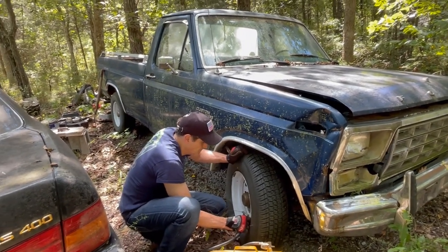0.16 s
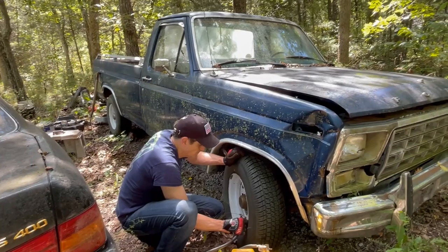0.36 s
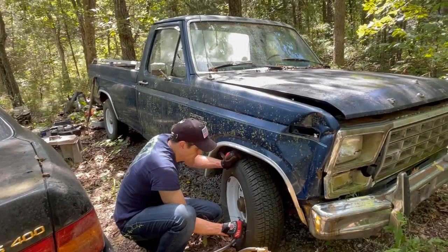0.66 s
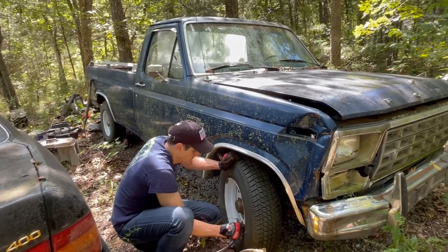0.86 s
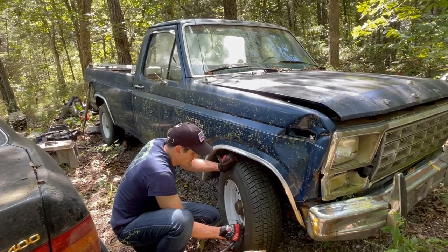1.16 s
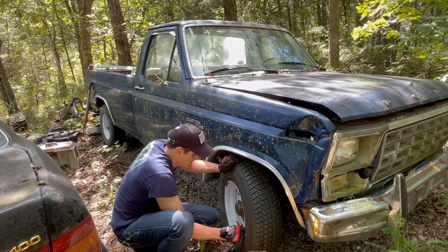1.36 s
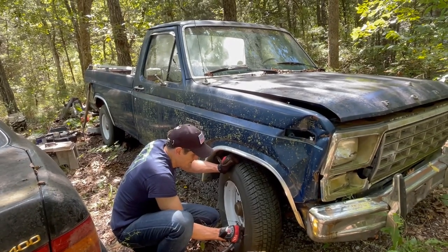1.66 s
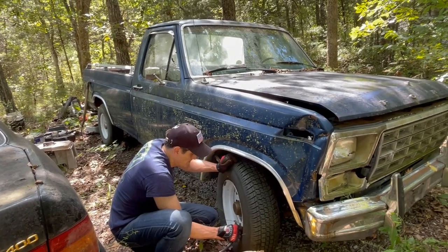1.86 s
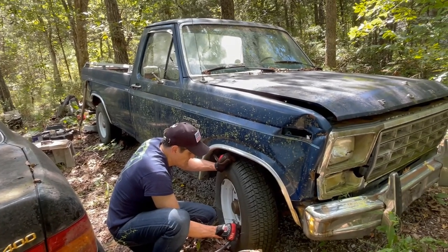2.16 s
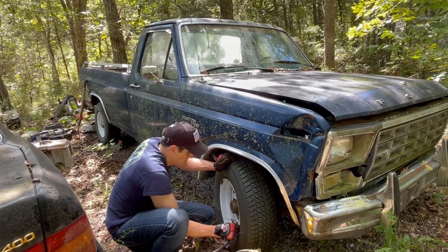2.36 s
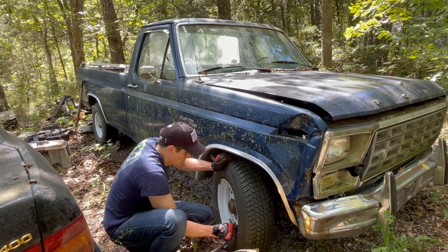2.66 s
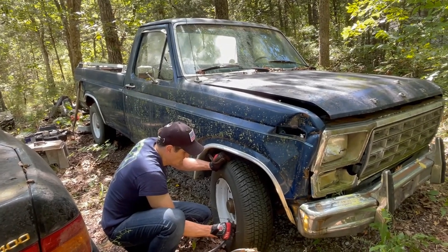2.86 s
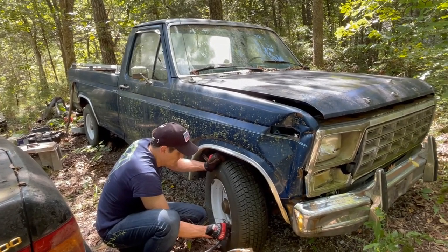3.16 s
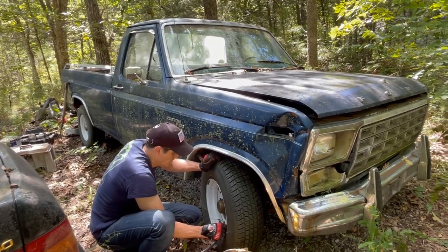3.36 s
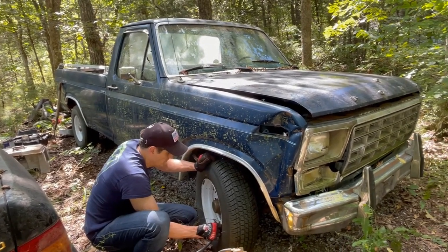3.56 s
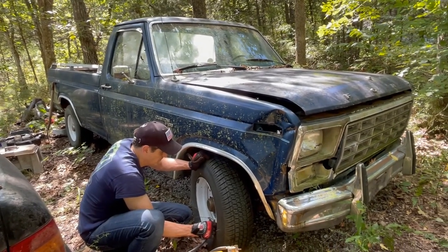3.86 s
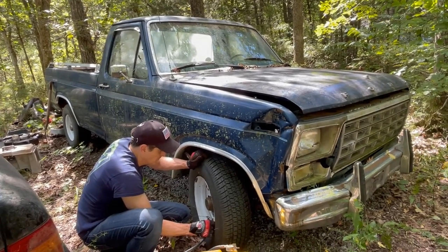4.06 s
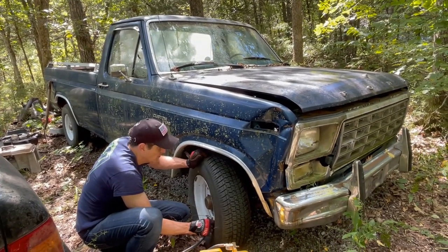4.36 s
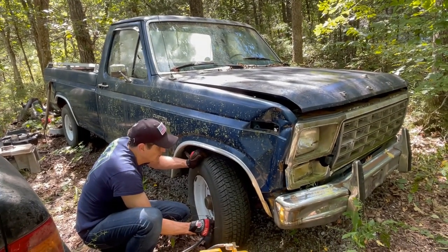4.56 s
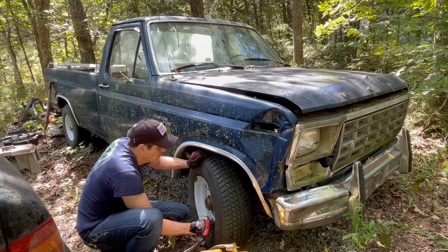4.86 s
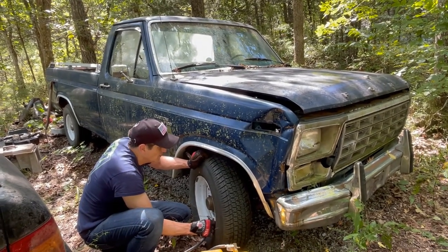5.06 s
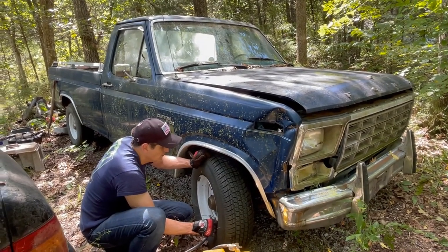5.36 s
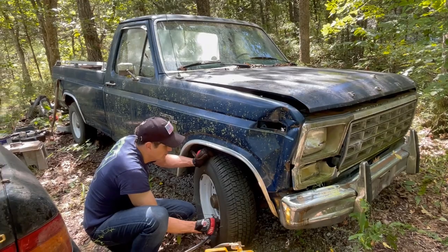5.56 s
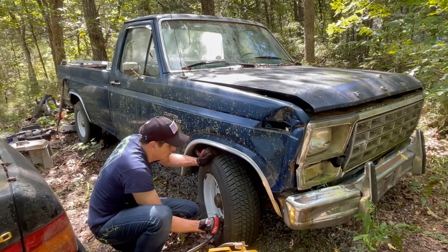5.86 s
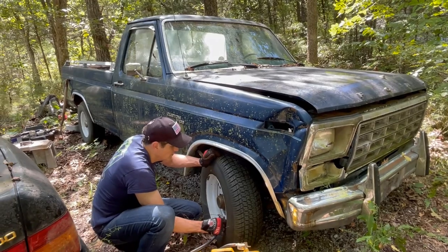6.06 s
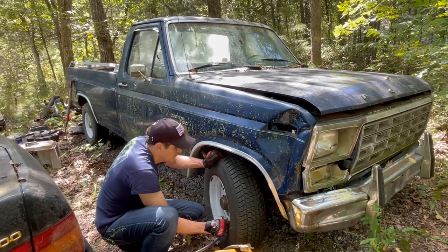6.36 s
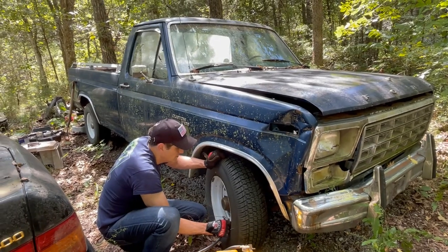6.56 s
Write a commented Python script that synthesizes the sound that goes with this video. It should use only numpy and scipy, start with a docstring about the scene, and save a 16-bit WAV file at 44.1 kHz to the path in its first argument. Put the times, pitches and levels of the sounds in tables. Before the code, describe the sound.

A tire is being inflated outdoors, air hissing steadily past the valve with quick pulses and thin whistling over a faint motor.

```python
"""In the woods, a tyre is being filled: compressed air hisses past the chuck held on the valve stem.
The leak swells as the hand shifts, and the gap makes gliding half-whistles and one thin high note.
Pump strokes, about eleven a second, add short spurts, and the flow keeps the air line ringing.
A motor hums some way off, over a faint rustle, a soft low hiss and a thin, very high one."""
import sys
import numpy as np
from scipy import signal
from scipy.fft import rfft, irfft
from scipy.io import wavfile
from scipy.ndimage import uniform_filter1d

SR = 44100
rng = np.random.default_rng(int(sys.argv[2]) if len(sys.argv) > 2 else 0)


def digitize_waveform(pressure):
    """Quantize a signal to 16-bit integers and store it at the path in sys.argv[1].

    Rows of a 2-D input are taken as channels; values are limited to [-1, 1].
    """
    field = np.atleast_2d(pressure).T
    bounded = np.clip(field, -1, 1)
    quanta = np.round(bounded * 32767).astype(np.int16)
    wavfile.write(sys.argv[1], SR, quanta)


N = 296352
TIME = np.arange(N) / SR
SIDES = np.array([[1], [-1]])  # left, right


def undb(db):
    """Turn decibels into a number to multiply by."""
    return 10 ** (np.asarray(db) / 20)


def unit(x):
    """Scale a signal to an average (rms) strength of 1."""
    return x / np.sqrt(np.mean(x ** 2))


def curve(table, t=TIME, column=1):
    """Read a table over time, joining its rows with straight lines."""
    rows = np.array(table, float)
    return np.interp(t, rows[:, 0], rows[:, column])


def colour(table, hz, column=1):
    """Read a table over frequency, giving each octave equal room."""
    rows = np.array(table, float)
    return np.interp(np.log(hz + 1), np.log(rows[:, 0]), rows[:, column])


def bell(offset, width):
    """A smooth bump of height 1."""
    return np.exp(-.5 * (offset / width) ** 2)


def wander(rate_hz):
    """A smooth random wobble of typical size 1; a higher rate wobbles faster."""
    f = np.fft.rfftfreq(N, 1 / SR)
    f = f[f < 4 * rate_hz]
    real, imag = rng.standard_normal((2, 4096))[:, :len(f)]
    return unit(irfft((real + 1j * imag) * np.exp(-(f / rate_hz) ** 2), N))


def swells(events, attack_s, release_s, t=TIME):
    """Decibels added by events (start, length, rise) that each grow, hold and let go."""
    return sum(db * np.clip(np.minimum((t - start) / attack_s, 1 - (t - start - length) / release_s), 0, 1)
               for start, length, db, *_ in events)


def flicker(x, depth_db):
    """Let neighbouring frequency bands of a noise rise and fall on their own."""
    spectrum = signal.stft(x, SR, nperseg=2048)[2]
    patches = rng.standard_normal(spectrum.shape[1:])
    patches = uniform_filter1d(patches, size=9, axis=0)
    patches = uniform_filter1d(patches, size=4, axis=1)
    return signal.istft(spectrum * undb(depth_db * unit(patches)), SR)[1][:, :N]


# How left and right differ. Each row: frequency in Hz, left minus right in dB, likeness from -1 to 1.
STEREO_IMAGE = [(93, -3, 0.8), (302, 2.5, 0.067), (730, 2.5, -0.47), (930, -3.5, 0.29), (1590, -3.5, 0.56),
                (1820, -7.5, 1), (2450, -0.5, 0.13), (2760, -2, -0.3), (3820, 4.5, 0.0073), (5500, 3, 0.02),
                (5800, 1, -0.25), (6620, 6.5, 0.36), (6960, 7, -0.16), (8350, 5, -0.16), (9350, -2, -0.2),
                (10940, 0.5, 0.81), (14200, 0.5, -0.72)]

def noise(gain_at):
    """Stereo noise of strength 1, shaped by a gain for each frequency."""
    f = np.fft.rfftfreq(N, 1 / SR)
    alike = np.clip(colour(STEREO_IMAGE, f, column=2), -1, 1)
    mid, side = rfft(rng.standard_normal((2, N)))
    pair = np.sqrt(1 + alike) * mid + SIDES * np.sqrt(1 - alike) * side
    balance = undb(SIDES * colour(STEREO_IMAGE, f) / 2)
    return unit(irfft(pair * balance * gain_at(f), N))


def coloured_noise(table):
    """Noise whose balance of low and high follows a table."""
    return noise(lambda f: undb(colour(table, f)))


def resonances(modes):
    """Noise ringing in narrow bands, each given as (pitch in Hz, width in Hz, level in dB)."""
    def gain_at(f):
        return np.sqrt(sum(undb(db) ** 2 / width / (1 + ((f - hz) / width) ** 2) ** 2
                           for hz, width, db in modes))
    return noise(gain_at) * np.sqrt(sum(undb(db) ** 2 for _, _, db in modes))


def reflections(f, t, count=8, drift=.035):
    """Echoes off wheel, wing and ground add ripples (dB) that slide as hand and microphones move."""
    delays_s = rng.uniform(.002, .011, (count, 2, 1, 1))
    sway = np.sin(t + rng.uniform(0, 2 * np.pi, (count, 1, 1, 1)))
    moving_s = np.float32(delays_s * (1 + drift * sway / 2))
    return 2 * np.cos(np.float32(2 * np.pi * f[:, None]) * moving_s).sum(axis=0) / np.sqrt(count)


# The tone of the hiss. Each row: frequency in Hz, relative level in dB.
HISS_COLOUR = [(1600, -43), (2000, -26), (2110, -16), (2640, -3.5), (3100, -5.5), (3700, -3.5), (4500, -3),
               (5550, -1.5), (6300, -1), (7250, -3), (8300, -11), (9700, -16), (10900, -24.5),
               (14000, -22.5)]
# The steady leak past the chuck. Each row: time in seconds, relative level in dB.
STEADY_LEAK = [(0, -40.5), (.45, -39.5), (1, -38.5), (3.2, -38), (4.1, -39), (5.6, -40), (6.72, -41)]
# The chuck slips, so the gap opens for a moment and rings.
# Each row: start in seconds, length in seconds, leak rise in dB, ring pitch in Hz, ring boost in dB.
CHUCK_SLIPS = [(-.05, 0.33, 3, 5260, 4), (1.27, 0.39, 1.5, 5340, 3), (2.574, 0.19, 0.4, 5350, 4),
               (2.767, 0.23, 1, 6100, 6), (3.057, 0.31, 0, 5240, 6.5), (3.35, 0.18, 0.2, 5500, 7),
               (4.29, 0.29, 1.5, 5260, -2), (4.548, 0.31, 1.5, 5200, 7), (5.66, .24, 3, 5200, 2),
               (5.88, 0.19, 3.5, 5200, 4), (6.07, .18, 1, 5250, 0)]
# How strongly the hiss follows the leak. Each row: frequency in Hz, dB gained per dB of leak.
LEAK_FOLLOWING = [(2800, 0), (3900, 1.1), (6500, 1.0), (8500, 1.1), (11000, .5)]
# The low part of the hiss. Each row: time in seconds, level change in dB.
LOW_HISS_LEVEL = [(0, -2.5), (.7, -1.5), (2.3, -1), (4.2, -3), (6, -3.5), (6.72, -4.5)]
# Resonances of the gap round the valve, which change as the chuck tilts. Each row: pitch in Hz,
# width in Hz, boost in dB at the start, boost in dB at the end, dB gained per dB of leak.
GAP_RESONANCES = [(3670, 130, 1.5, 3.5, -0.23), (4100, 200, -.5, 0, 0.8), (5320, 95, 1, 2.5, 1),
                  (6000, 90, 2, 0, 0.4), (7430, 60, 1, 3, -.4)]

def leak_hiss(phase, gain_db=2, flutter_db=.61, stroke_dip_db=1.16, pan_db=-.56):
    """Swirling air escapes past the chuck; a wider gap lifts the upper hiss and alters its ringing."""
    f, t, spectrum = signal.stft(coloured_noise(HISS_COLOUR), SR, nperseg=1024)
    freq = f[:, None]
    slip_shape = dict(attack_s=.11, release_s=.08, t=t)
    leak_db = curve(STEADY_LEAK, t) + swells(CHUCK_SLIPS, **slip_shape)
    surge_db = leak_db - leak_db.mean()
    follows = colour(LEAK_FOLLOWING, freq)
    db = follows * (surge_db + SIDES[:, None] * pan_db / 2) + reflections(f, t)
    # the low hiss keeps its own level and rises between pump strokes
    low_share = np.clip(1 - follows, 0, 1) * (freq < LEAK_FOLLOWING[1][0])
    stroke = np.interp(t, TIME, np.cos(2 * np.pi * phase))
    db += low_share * (curve(LOW_HISS_LEVEL, t) - stroke_dip_db * stroke)
    tilt = t / t[-1]
    for hz, width, first_db, last_db, per_leak_db in GAP_RESONANCES:
        db += bell(freq - hz, width) * (first_db + (last_db - first_db) * tilt + per_leak_db * surge_db)
    for start, length, _, hz, ring_db in CHUCK_SLIPS:
        db += bell(freq - hz, width=85) * swells([(start, length, ring_db)], **slip_shape)
    hiss = signal.istft(spectrum * undb(db), SR)[1][:, :N]
    return hiss * undb(leak_db.mean() + gain_db + flutter_db * wander(51))


# The chuck's narrow tones. Each row: pitch in Hz, width in Hz, relative level in dB.
CHUCK_TONES = [(2714, 20, -60), (3636, 18, -62), (7418, 24, -60)]

def chuck_tones(start_db=3.5, fade_db_per_s=2.5):
    """Air rings in the chuck as in a small pipe, fading steadily."""
    return resonances(CHUCK_TONES) * undb(start_db - fade_db_per_s * TIME)


# A half-whistle that glides as the hand shifts.
# Each row: time in seconds, pitch in Hz, relative level in dB.
LOWER_GLIDE = [(0, 5880, -50), (.4, 5690, -49.5), (1.2, 5700, -48.5), (2.3, 5630, -49), (2.85, 5740, -48.5),
               (3.55, 5720, -48.5), (3.85, 5470, -51), (4.6, 5440, -51), (5.1, 5660, -52.5),
               (6.72, 5690, -53.5)]
# A higher one that stands out late. Each row: time in seconds, pitch in Hz, relative level in dB.
UPPER_GLIDE = [(0, 6450, -63), (4.15, 6380, -56), (4.4, 6450, -49.5), (4.7, 6650, -50.5), (5.4, 6600, -57),
               (5.8, 6540, -48.5), (6.0, 6420, -50), (6.15, 6640, -51), (6.72, 6640, -54)]

def half_whistle(glide, gain_db, width_hz=65, waver_hz=25, unsteady_db=2, pan_db=2):
    """The gap nearly whistles: a narrow band of rushing air glides, wavers and comes and goes."""
    pitch = curve(glide) + waver_hz * wander(7)
    band = signal.hilbert(resonances([(pitch.mean(), width_hz, 0)]))
    gliding = np.real(band * np.exp(2j * np.pi * np.cumsum(pitch - pitch.mean()) / SR))
    level_db = curve(glide, column=2) + gain_db + unsteady_db * wander(9)
    return gliding * undb(level_db + SIDES * pan_db / 2)


# The motor's loudness. Each row: time in seconds, relative level in dB.
MOTOR_LEVEL = [(0, -60.5), (.28, -59), (.8, -65), (1.6, -62), (3.2, -63), (5, -61), (5.8, -57.5),
               (6.25, -60), (6.5, -63.5)]
# Its rumble. Each row: frequency in Hz, relative level in dB.
MOTOR_RUMBLE = [(20, -36), (35, -18), (50, 0.5), (75, 3.5), (110, 0), (160, -5.5), (230, -37), (400, -23)]
# Its hum. Each row: pitch in Hz, width in Hz, relative level in dB.
MOTOR_HUM = [(59.5, 6, -66), (89.5, 9, -69)]

def far_motor(rumble_db=-1, hum_db=-2.5, flutter_db=2):
    """A distant motor's rumble and hum swell and fade together."""
    level_db = curve(MOTOR_LEVEL)
    rumble = coloured_noise(MOTOR_RUMBLE) * undb(level_db + rumble_db + flutter_db * wander(5.8))
    hum = resonances(MOTOR_HUM) * undb(level_db - level_db.mean() + hum_db)
    return rumble + hum


# The rustle's loudness. Each row: time in seconds, relative level in dB.
RUSTLE_LOUDNESS = [(0, -68.5), (.9, -80), (2.2, -70.5), (2.5, -77.5), (4, -82.5), (4.5, -71.5), (5.6, -75),
                   (6.72, -82)]

def rustle(gain_db=2, uneven_db=4):
    """A faint, low rustle: three bands of noise waver separately."""
    bands = sum(resonances([(hz, hz / 3, 0)]) * undb(uneven_db * wander(20)) for hz in (190, 280, 420))
    return unit(bands) * undb(curve(RUSTLE_LOUDNESS) + gain_db)


# The tone of the background hiss. Each row: frequency in Hz, relative level in dB.
BACKGROUND_COLOUR = [(250, -2), (380, -.5), (520, 3.5), (760, -4.5), (1100, -7), (2000, -7), (9000, -30)]

def background_hiss(level_db=-66):
    """A soft, low background hiss whose bands flicker at random."""
    return unit(flicker(coloured_noise(BACKGROUND_COLOUR), depth_db=4.2)) * undb(level_db)


# The tone of the very high hiss. Each row: frequency in Hz, relative level in dB.
HIGH_HISS_COLOUR = [(9000, -34), (11500, -3), (13800, -27), (15300, 14), (16000, -10.5)]

def high_hiss(gain_db=-58):
    return coloured_noise(HIGH_HISS_COLOUR) * undb(gain_db)


# The pump's speed. Each row: time in seconds, strokes per second.
PUMP_SPEED = [(0, 11.347), (.8, 11.476), (1.7, 11.545), (2.4, 11.396), (3.2, 10.99), (4, 11.397),
              (6.7, 11.298)]

def pump_phase(first_stroke_s=.079):
    """Where the pump is in its cycle, from -0.5 to 0.5, with the main spurt at 0."""
    turns = np.cumsum(curve(PUMP_SPEED)) / SR - first_stroke_s * PUMP_SPEED[0][1]
    return (turns + .5) % 1 - .5


# How loud the spurts peak. Each row: time in seconds, level in dB for an ordinary stroke.
SPURT_LEVEL = [(0, -39), (.45, -37.3), (2.2, -37.3), (3.5, -37.8), (4.2, -44), (6.7, -51)]
# Strokes that force out more air than the rest. Each row: time in seconds, rise in dB.
STRONG_STROKES = [(.34, 1.5), (.43, 3), (1.21, 4), (1.30, 4), (1.56, 4), (1.645, 3.5), (1.825, 2.5),
                  (1.905, 3), (2.695, 4), (2.87, 2.5), (3.13, 4), (3.22, 3), (3.51, 4.5), (3.6, 2.5)]
# What a spurt rings with. Each row: pitch in Hz, width in Hz, relative level in dB.
SPURT_RINGS = [(5340, 130, -1), (5680, 120, -2.5), (6700, 800, -3.5)]

def pump_spurts(phase, width_cycles=.055, early_db=-7, lead_cycles=.23):
    """Each stroke drives a short burst through the chuck's hollow, with a weaker one just ahead."""
    bursts = bell(phase, width_cycles) + undb(early_db) * bell(phase + lead_cycles, width_cycles)
    push_db = sum(db * bell(TIME - at, width=.025) for at, db in STRONG_STROKES)
    return unit(resonances(SPURT_RINGS)) * bursts * undb(curve(SPURT_LEVEL) + push_db)


def ring_level(base_db, fade_db_per_s, fade_in_s=.12, fade_in_db=15):
    """The ringing's level in dB: it is faded in at the start, then slowly dies down."""
    return base_db - fade_in_db * np.clip(1 - TIME / fade_in_s, 0, 1) - fade_db_per_s * TIME


def sag(x, hz_per_s):
    """Slide a ring steadily down, passing its own pitch at half time."""
    return np.real(signal.hilbert(x) * np.exp(-1j * np.pi * hz_per_s * (TIME - TIME.mean()) ** 2))


# The strongest ring swells or dips. Each row: start in seconds, length in seconds, change in dB.
MAIN_RING_SWELLS = [(.12, 0.1, 3), (.84, .78, 3), (1.67, .16, -3), (1.89, 0.08, 6), (2.2, .3, -2),
                    (2.67, 0.12, 4), (2.83, .1, -3), (2.98, 0.23, 2), (3.39, 0.22, 5.5), (3.66, .07, -4),
                    (4.16, .1, 5.5), (4.3, .22, -2), (5.47, 0.16, 5.5), (6.2, .28, -6)]
# Weaker rings of the line and wheel. Each row: pitch in Hz, width in Hz, relative level in dB.
LINE_RINGS = [(906, 11, -81), (980, 52, -75.5), (1125, 30, -84), (1182, 13, -79), (1228, 20, -84.5),
              (1283, 9, -81.5), (1368, 8, -80), (1536, 18, -76.5), (1620, 34, -76), (1715, 24, -83.5),
              (1876, 20, -79), (2095, 16, -78)]

def air_line(main_hz=1506, main_width_hz=11, flutter_db=1.5):
    """The flow keeps the line ringing; the strongest ring flutters and slowly sinks in pitch."""
    main = sag(resonances([(main_hz, main_width_hz, 0)]), hz_per_s=2.8)
    # it nearly sings by itself, which evens out its swings
    power = uniform_filter1d(np.mean(main ** 2, axis=0), size=3000)
    main = unit(main / np.sqrt(power + .09))
    main_db = ring_level(-65.5, fade_db_per_s=.2) + flutter_db * wander(26)
    main_db += swells(MAIN_RING_SWELLS, attack_s=.02, release_s=.046)
    others = flicker(resonances(LINE_RINGS), depth_db=2.8)
    return main * undb(main_db) + others * undb(ring_level(7, fade_db_per_s=1))


# The faint whistle grows louder. Each row: start in seconds, length in seconds, rise in dB.
WHISTLE_SWELLS = [(2.05, .65, 9), (3.2, 2.3, 5), (3.9, 1.2, 2.5)]
# Its note. Each row: time in seconds, pitch in Hz.
WHISTLE_NOTE = [(1.7, 8690), (2.6, 8635), (3.0, 8670), (4.8, 8655), (5.6, 8620), (6.0, 8560)]

def edge_whistle(base_db=-65.5, waver_hz=9, flicker_db=3):
    """Air over the edge of the seal sings a thin, unsteady note."""
    pitch = curve(WHISTLE_NOTE) + waver_hz * wander(43)
    phase = 2 * np.pi * np.cumsum(pitch) / SR
    pair = np.array([np.sin(phase + shift) * undb(flicker_db * wander(27)) for shift in (1.9, 0)])
    return np.sqrt(2) * pair * undb(base_db + swells(WHISTLE_SWELLS, attack_s=.15, release_s=.45))


def scene():
    """Escaping air, pump spurts and the ringing line, with the motor and faint noises behind."""
    phase = pump_phase()
    half_whistles = half_whistle(LOWER_GLIDE, gain_db=2.5) + half_whistle(UPPER_GLIDE, gain_db=-2)
    valve = leak_hiss(phase) + chuck_tones() + half_whistles + pump_spurts(phase) + edge_whistle()
    return valve + air_line() + far_motor() + rustle() + background_hiss() + high_hiss()


def record(dry, top_hz=15750):
    """A steep filter cuts away the highest treble."""
    return signal.sosfilt(signal.ellip(12, .1, 80, top_hz, fs=SR, output="sos"), dry)


dry = scene()
out = record(dry)
digitize_waveform(out)
```